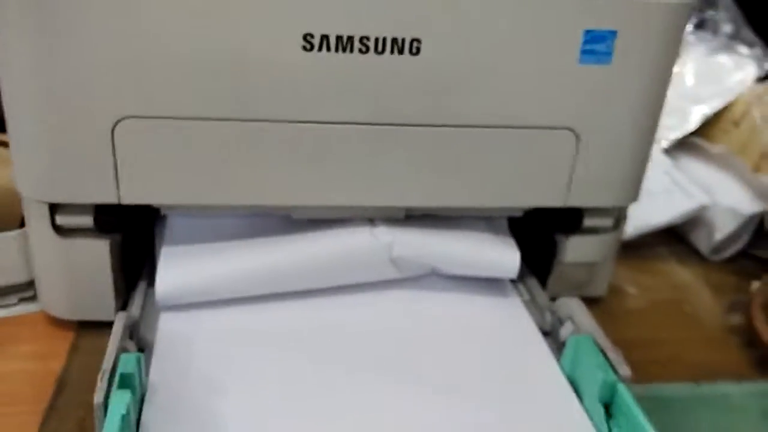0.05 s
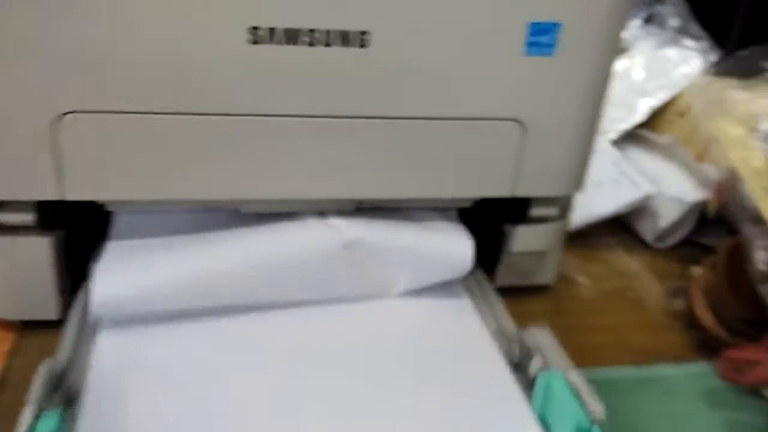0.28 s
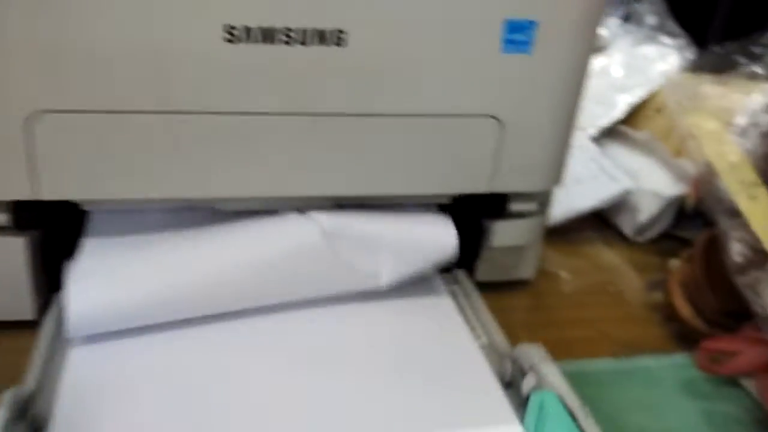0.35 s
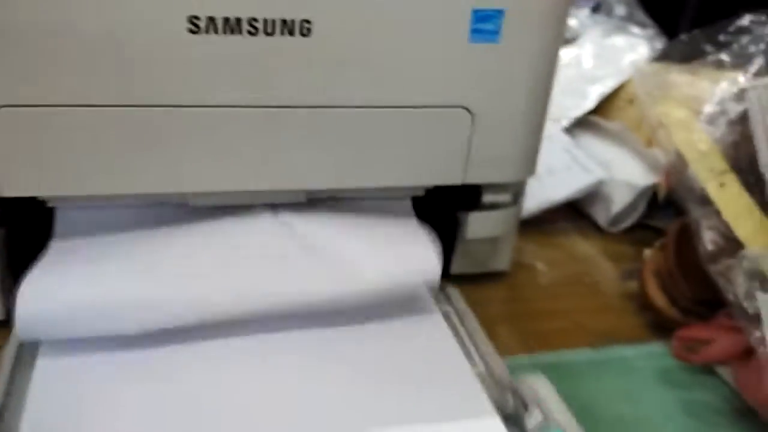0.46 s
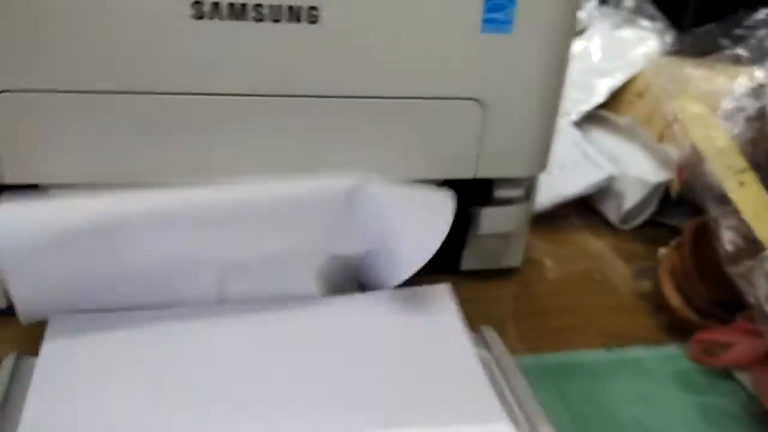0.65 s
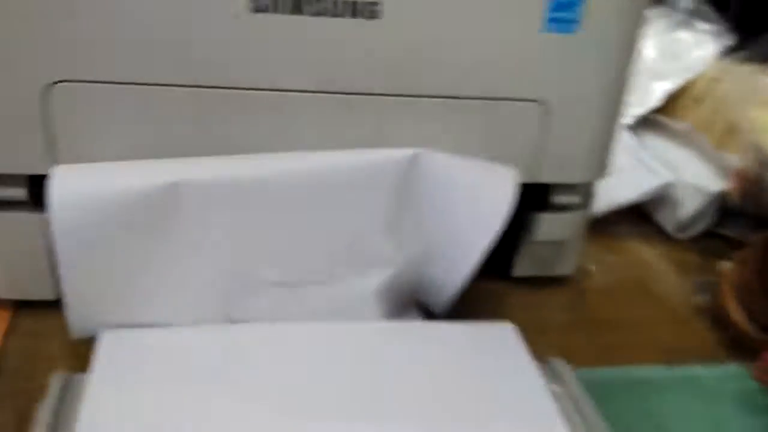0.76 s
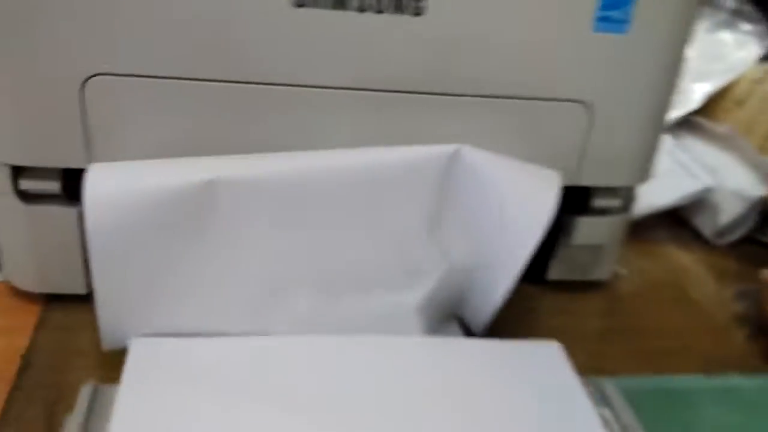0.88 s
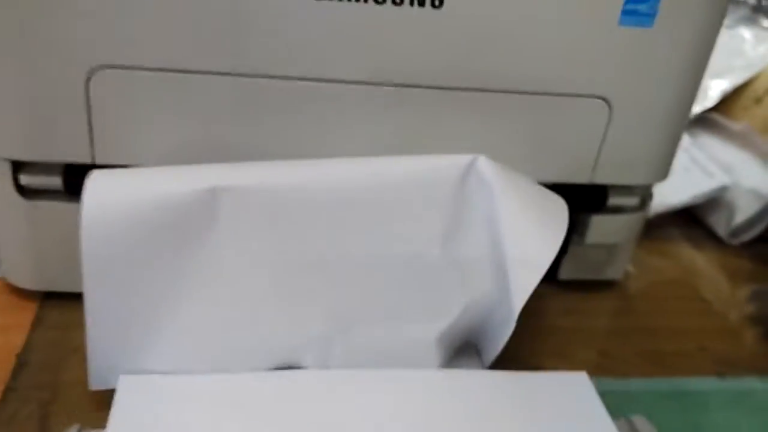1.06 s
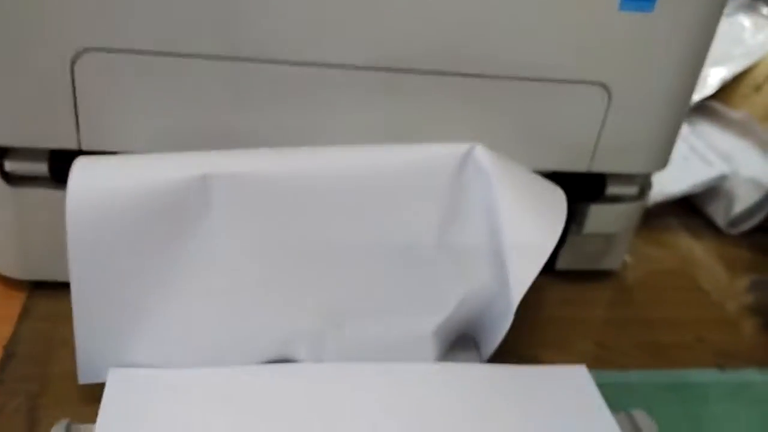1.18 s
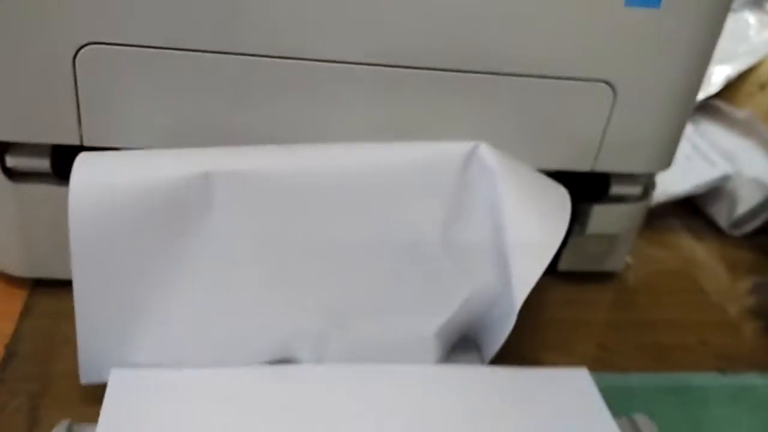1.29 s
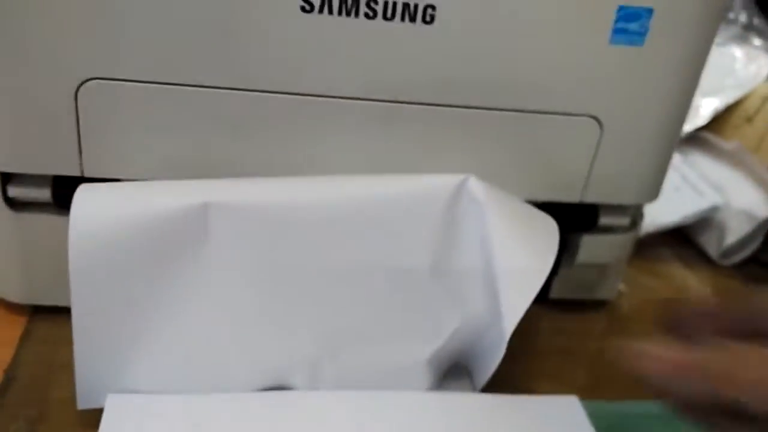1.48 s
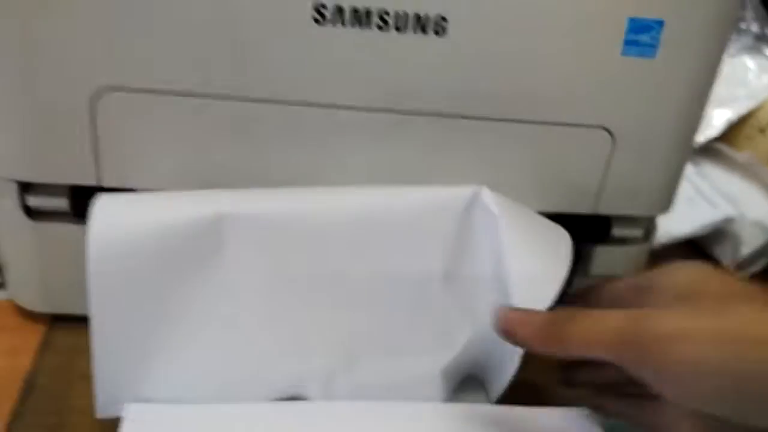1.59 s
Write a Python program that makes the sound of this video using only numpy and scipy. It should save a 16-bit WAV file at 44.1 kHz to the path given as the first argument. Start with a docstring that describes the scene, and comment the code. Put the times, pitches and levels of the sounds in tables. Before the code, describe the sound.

A jammed sheet drags and buckles in a printer, with bright crease snaps leaning left, short hollow pops and sliding hiss, then thins out to quiet room hum; close stereo microphone, lively hard room.

```python
"""In a hard room, close to a microphone with two openings, a jammed sheet is dragged into a printer.
Creases snap as bursts of grainy noise, and panels of the sheet buckle with short hollow pops made of
unsteady ringing tones. Hiss and tiny crackles rustle between them, and a sliding edge whistles briefly.
The room rings on as noise that dies away, over a low hum and hiss made of coloured noise."""
import sys
import numpy as np
from scipy import signal
from scipy.fft import rfft, irfft
from scipy.io import wavfile
from scipy.ndimage import uniform_filter1d

SR = 44100
rng = np.random.default_rng(int(sys.argv[2]) if len(sys.argv) > 2 else 0)


def ratio_of_db(decibels):
    """Turn decibels (scalar or array-like) into linear amplitude factors; 0 dB maps to 1."""
    return 10 ** (np.asarray(decibels, float) / 20)


def to_wav(s):
    """Save 16-bit WAV."""
    ch = np.atleast_2d(s).T  # columns
    pcm = np.round(np.clip(ch, -1, 1) * 32767)  # PCM
    wavfile.write(sys.argv[1], SR, pcm.astype(np.int16))


N = 72765  # length in samples


def evened(x):
    """Scales x to an rms of 1."""
    return x / np.sqrt(np.mean(x ** 2) + 1e-20)


def read(points, hz):
    """Reads a curve of (pitch_hz, value) points, with straight lines on a log pitch scale."""
    point_hz, value = np.transpose(points)
    return np.interp(np.log(hz + 1), np.log(point_hz + 1), value)


def colour(x, points):
    """Shapes x by a spectrum in dB."""
    hz = np.fft.rfftfreq(x.shape[-1], 1 / SR)
    return irfft(rfft(x) * ratio_of_db(read(points, hz)), x.shape[-1])


def ports(pair, same, balance, lead):
    """Two unrelated versions of a sound are mixed into the left and right microphone signals."""
    hz = np.fft.rfftfreq(N, 1 / SR)
    first, second = rfft(pair)
    likeness = np.clip(read(same, hz), -1, 1)
    tilt = ratio_of_db(read(balance, hz) / 2)
    right = likeness * first + np.sqrt(1 - likeness ** 2) * second
    right = right * np.exp(-1j * read(lead, hz))
    return irfft(np.array([first * tilt, right / tilt]) * 2 / (tilt + 1 / tilt), N)


# colour of room hum and microphone hiss: pitch_hz, relative level_db
HUM_COLOUR = [(15, -60), (25, -36.5), (75, -11.5), (164, -7), (209, -11), (322, -5.5), (410, -20),
              (522, -15.5), (1110, -29), (6370, -42.5), (8300, -34), (11500, -43), (14500, -45),
              (14750, -81)]
# how alike the hum is on both sides: pitch_hz, likeness (1 = same)
HUM_LIKENESS = [(60, 1), (130, 1), (290, 0.95), (640, 0.43), (1410, 0), (3100, 0.53), (6820, -0.0),
                (15000, 0.3)]
# how much louder the hum is on the left: pitch_hz, left_over_right_db
HUM_SIDES = [(60, -3.5), (180, 3), (550, 2.5), (1650, 0), (4970, 1), (15000, 9.5)]
# the deepest hum and the high hiss waver: time_s, hum_change_db, hiss_change_db
HUM_WAVER = [(0.0, -2, 7.5), (0.3, -10, 12), (1.099, -1.5, 13.5), (1.3, -3.5, -1.5), (1.42, 2, -4.5),
             (1.501, -2.5, -1), (1.6, 3.5, 4)]


def hum():
    """Low lumpy room noise with drifting patches over microphone hiss."""
    level_db, patch_db = -51.5, 1.3
    hz, t, z = signal.stft(rng.standard_normal((2, N)), SR, nperseg=2048, noverlap=1536)
    patches = uniform_filter1d(rng.standard_normal(z.shape[1:]), size=4, axis=0)
    patches = evened(uniform_filter1d(patches, size=4, axis=1))
    s, hum_db, hiss_db = np.transpose(HUM_WAVER)
    deep = np.outer(hz < 130, np.interp(t, s, hum_db))
    high = np.outer(abs(hz - 8500) < 2000, np.interp(t, s, hiss_db))
    lumps = patch_db * patches * (hz < 1200)[:, None]
    z = z * ratio_of_db(read(HUM_COLOUR, hz)[:, None] + lumps + deep + high)
    pair = signal.istft(z, SR, nperseg=2048, noverlap=1536)[1][:, :N]
    no_lead = [(0, 0), (SR, 0)]
    return ratio_of_db(level_db) * evened(ports(pair, HUM_LIKENESS, HUM_SIDES, no_lead))


# how long the far walls ring: pitch_hz, t60_s (time to fall 60 dB)
ROOM_T60 = [(150, 0.5), (400, 3.1), (1000, 0.64), (3000, 1), (8000, 1), (14000, 2.7)]


def room(x):
    """Close reflections and a long tail whose bands die at their own speed."""
    near_db, near_t60_s = -9, 0.12  # desk and printer front
    far_db, far_rise_s = -18, 0.0085  # far walls
    hz, t, z = signal.stft(rng.standard_normal((2, SR)), SR, nperseg=256)
    fading = z * ratio_of_db(-60 * t / read(ROOM_T60, hz)[:, None])
    tail = signal.istft(fading, SR, nperseg=256)[1][:, :SR]
    seconds = np.arange(SR) / SR
    tail = tail * np.clip(seconds / far_rise_s, 0, 1)
    near = rng.standard_normal((2, SR)) * ratio_of_db(-60 * seconds / near_t60_s)
    far_part = ratio_of_db(far_db) * tail / np.linalg.norm(tail[0])
    near_part = ratio_of_db(near_db) * near / np.linalg.norm(near[0])
    return signal.fftconvolve(x[:1], far_part + near_part, axes=1)[:, :N]


# paper sliding: time_s, level_db (before the trim in rustle)
DRAG_LEVEL = [(0, -76), (.1, -51.5), (.19, -59), (.22, -48), (0.297, -47.5), (0.359, -34.5), (0.416, -37.5),
              (.44, -37), (.5, -31), (0.548, -37.5), (.565, -23), (0.6, -32.5), (.62, -34.5),
              (0.681, -34.5), (0.704, -29), (0.728, -28), (0.759, -40.5), (.95, -49.5), (1.08, -50),
              (1.218, -57.5), (1.399, -71)]
# colour of the sliding hiss: pitch_hz, relative level_db
RUSTLE_COLOUR = [(59, -52.5), (100, -20.5), (299, 0), (711, -4.5), (842, -0.5), (1310, -4.5), (3920, -11),
                 (8750, -13.5), (14500, -25)]


def rustle():
    """Sliding hiss and tiny random crackles follow the drag on the sheet."""
    trim_db, crackles_per_s, spread_db = -1, 1800, 3.3
    share = 0.42  # part of the hiss level that the crackles control
    strength = ratio_of_db(spread_db * np.minimum(rng.exponential(1, N), 4))
    crackles = strength * (rng.random(N) < crackles_per_s / SR)
    crackles = evened(signal.lfilter([1], [1, -0.94], crackles))  # each click fades quickly
    hiss = evened(colour(rng.standard_normal((2, N)), RUSTLE_COLOUR))
    s, db = np.transpose(DRAG_LEVEL)
    drag = ratio_of_db(trim_db + np.interp(np.arange(N) / SR, s, db))
    return hiss * (1 - share + share * crackles) * drag


# an edge whistles as it slides: loudest_s, swell_s, pitch_hz, level_db
EDGE_SQUEAKS = [(0.677, 0.057, 8740, -35)]


def squeak():
    """A narrow band of noise swells, then stops faster than it came."""
    reach_hz = 2 * 532  # distance from the centre at which the band is 60 dB down
    out, t = np.zeros((2, N)), np.arange(N) / SR
    for s, swell_s, hz, db in EDGE_SQUEAKS:
        band = [(hz - reach_hz, -60), (hz, 0), (hz + reach_hz, -60)]
        whistle = evened(colour(rng.standard_normal((2, N)), band))
        width_s = np.where(t < s, swell_s / 2, swell_s / 5)
        out += ratio_of_db(db) * whistle * np.exp(-((t - s) / width_s) ** 2)
    return out


# small panels buckling: start_s, level_db (before the lift in pops), pitch_hz, t60_ms (3 at least)
PANEL_POPS = [(0.0815, -36, 857, 32), (0.202, -34.5, 1097, 44), (0.208, -20.5, 1050, 23.2),
              (0.3185, -20, 970, 13), (0.339, -25, 1150, 28), (0.349, -8, 1087, 16.6),
              (0.358, -25.5, 1180, 19), (0.424, -23.5, 1120, 10), (0.434, -28, 1030, 5.7),
              (0.512, -33.5, 1114, 45), (0.566, -28, 1083, 31), (0.58, -22.5, 1400, 19),
              (0.592, -29, 810, 41), (0.619, -30, 1360, 36), (0.69, -30, 712, 80), (0.715, -14, 944, 33.8),
              (0.736, -13.5, 834, 7.7), (0.794, -31.5, 895, 19), (0.807, -39, 860, 23),
              (0.9345, -23.5, 986, 15), (0.965, -40, 1070, 32), (1.068, -47.5, 813, 190),
              (1.105, -32, 961, 22), (1.306, -54.5, 2136, 38)]
# the whole sheet flexing against the tray: same columns, start_s, level_db, pitch_hz, t60_ms
SHEET_FLEXES = [(0.2085, -17.5, 472, 21), (0.423, -32, 509, 130), (0.446, -27, 322, 34),
                (0.458, -20, 277, 30), (0.483, -25.5, 340, 24), (0.517, -27, 502, 59),
                (0.552, -19, 375, 44), (0.717, -18, 535, 17), (0.79, -39, 362, 46), (0.838, -31, 311, 72),
                (0.909, -34.5, 312, 26), (0.935, -23.5, 408, 33), (0.963, -38.5, 325, 92),
                (1.107, -39, 346, 58)]


def pops():
    """Each buckling panel or flexing sheet rings a few unsteady cycles."""
    rise_cycles, lift_db = 0.97, 5.0
    noise_share, wander_rad = 0.17, 0.41  # unrest of loudness and of phase
    out, rows = np.zeros((2, N)), PANEL_POPS + SHEET_FLEXES
    t = np.arange(6000) / SR
    quarter_turn = np.array([[0], [np.pi / 2]])  # sets the two versions apart
    for (s, db, hz, t60_ms), phase in zip(rows, rng.uniform(0, 2 * np.pi, len(rows))):
        smoother = np.hanning(round(3 * SR / hz))  # three cycles long
        ragged = evened(np.convolve(rng.standard_normal(len(t)), smoother, "same"))
        wander = evened(np.convolve(rng.standard_normal(len(t)), smoother, "same"))
        rise = 1 - np.exp(-(t * hz / rise_cycles) ** 2)
        decay = ratio_of_db(db + lift_db - 60000 * t / max(t60_ms, 3))
        ring = np.sin(2 * np.pi * hz * t + wander_rad * wander + phase + quarter_turn)
        pop = (1 + noise_share * ragged) * rise * decay * ring
        part = out[:, round(s * SR):][:, :len(t)]
        part += pop[:, :part.shape[1]]
    return out


# creases breaking: start_s, treble_db, middle_db, air_db, decay_ms
# levels come before the band offset; decay is the time to fall 20 dB, before the band stretch
CREASE_SNAPS = [(0.083, -35, -45.5, -37, 10.5), (0.0915, -40.5, -65, -52, 29),
                (0.1264, -37, -52.5, -34, 7.5), (0.2055, -21.5, -38, -31, 14),
                (0.3194, -17.5, -34, -37.5, 5), (0.3391, -11, -27.5, -39.5, 4.5),
                (0.3491, -7.5, -27, -16.5, 6), (0.4242, -3.5, -17.5, -33.5, 9.5),
                (0.4336, -12, -19, -36, -2.5), (0.441, -12, -29, -28, 13.5), (0.4597, -9.5, -36, -33, 4),
                (0.482, -5, -23.5, -25.5, 3.5), (0.514, -28, -36.5, -52.5, 18.5),
                (0.5534, 0.5, -22.5, -15, 5), (0.5653, -19, -27, -42, 2.5), (0.587, -16, -33, -42.5, 19.5),
                (0.615, -23.5, -36, -47.5, 16.5), (0.685, -25, -31, -39, 12.5),
                (0.691, -18, -31.5, -56.5, 22), (0.712, -28, -32.5, -53, 19), (0.7923, -26, -34.5, -50, 8),
                (0.8045, -22.5, -67, -38.5, 4), (0.8344, -9, -24, -26.5, 8.5), (0.908, -37, -41.5, -59, 6),
                (0.9361, -36.5, -31.5, -66, 2.5), (1.1065, -48, -38.5, -72.5, 6)]
# colour of the three snap bands: pitch_hz, relative level_db
TREBLE_COLOUR = [(2800, -36.5), (4500, -6), (6500, -7), (8000, -1.5), (9500, -5.5), (11500, -20)]
MIDDLE_COLOUR = [(250, -19), (700, -4.5), (1600, 2), (2500, 0.5), (4000, -7), (6000, -17), (8000, -35)]
AIR_COLOUR = [(8000, -30), (10000, -2), (14500, -0.5)]
# for treble, middle and air in turn: offset_db
BAND_OFFSET = [-3.5, 8, 7.5]
# for treble, middle and air in turn: stretch of the decay (a plain factor)
BAND_DECAY = [0.74, 1.62, 0.63]


def snaps():
    """Grainy noise in three bands, let through in a burst for each crease; the middle dies slowest."""
    rise_share, grain_db = 0.13, 1.5  # the rise is a share of the decay
    strain_db, strain_ms = -16, 3.75  # fibres crackle around the break: level under it, time for 20 dB
    smoother = np.hanning(SR // 1000)  # about 1 ms
    grain = ratio_of_db(grain_db * evened(np.convolve(rng.standard_normal(N), smoother, "same")))
    out, t = np.zeros((2, N)), np.arange(N) / SR
    for k, band in enumerate((TREBLE_COLOUR, MIDDLE_COLOUR, AIR_COLOUR)):
        gate = np.zeros(N)
        for row in CREASE_SNAPS:
            start_s, level_db, decay_ms = row[0], row[k + 1] + BAND_OFFSET[k], row[4] * BAND_DECAY[k]
            near = slice(round((start_s - 0.03) * SR), round((start_s + 0.1) * SR))
            ms = (t[near] - start_s) * 1000
            decays = np.maximum(ms, 0) / max(decay_ms, 1.5)  # time counted in decays
            strain = ratio_of_db(strain_db - 20 * abs(ms) / strain_ms)
            burst = (1 - np.exp(-(decays / rise_share) ** 2)) * ratio_of_db(-20 * decays)
            gate[near] += ratio_of_db(level_db) * (strain + burst)
        out += gate * evened(colour(rng.standard_normal((2, N)), band))
    return evened(grain) * out


# thin paper gives little bass: pitch_hz, level_db
SHEET_COLOUR = [(30, -26.5), (120, 0.5), (220, -5), (300, -1), (13500, 0), (14550, -13.5), (14700, -41)]
# how alike the paper is on both sides: pitch_hz, likeness (1 = same)
PAPER_LIKENESS = [(100, 0.91), (400, 0.93), (1100, 0.86), (2500, 0.23), (8000, 0.2), (14000, 0.19)]
# how much louder the paper is on the left: pitch_hz, left_over_right_db
PAPER_SIDES = [(60, -2), (300, 0.5), (1300, 2.5), (2400, 4.5), (4400, 3.5), (8100, 16.5), (11000, 11.5),
               (15000, 1.5)]
# how far the left side runs ahead: pitch_hz, lead_radians
PAPER_AHEAD = [(1200, 0.57), (1600, 1.9), (2000, 0.24), (3000, 4.5), (14000, 22)]


def scene():
    """The paper and its room reach both microphone openings, over the hum."""
    paper = colour(snaps() + pops() + rustle() + squeak(), SHEET_COLOUR)
    return ports(paper + room(paper), PAPER_LIKENESS, PAPER_SIDES, PAPER_AHEAD) + hum()


def band_limit(x):
    """A steep low-pass at the top of the band."""
    return signal.sosfilt(signal.butter(12, 15610, fs=SR, output="sos"), x)


def record(dry):
    """Peaks beyond full scale are cut flat."""
    mix = np.clip(dry, -1, 1)
    return band_limit(mix)


dry = scene()
out = record(dry)
to_wav(out)
```